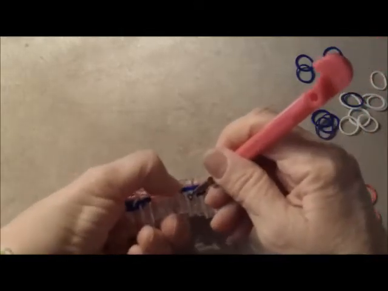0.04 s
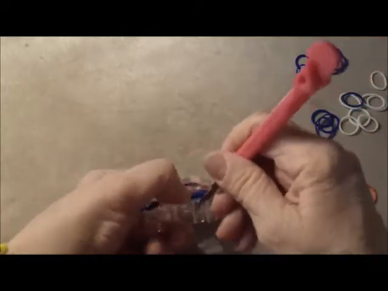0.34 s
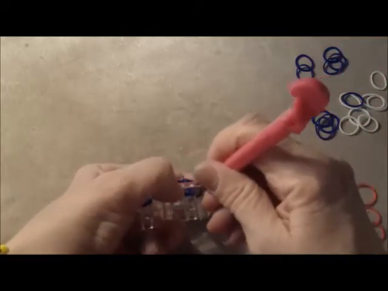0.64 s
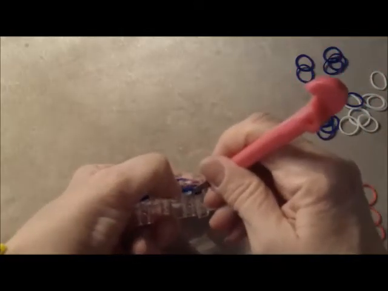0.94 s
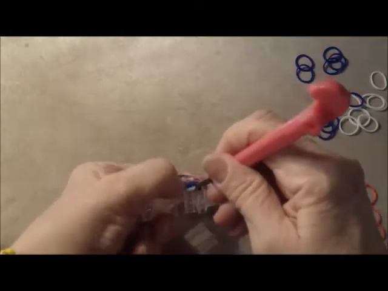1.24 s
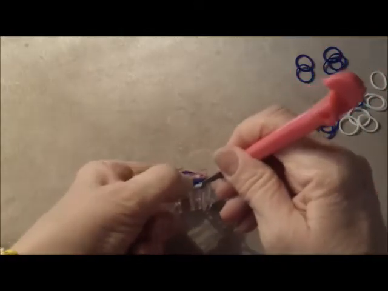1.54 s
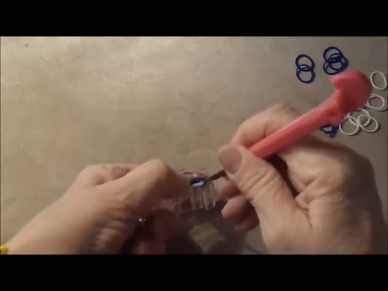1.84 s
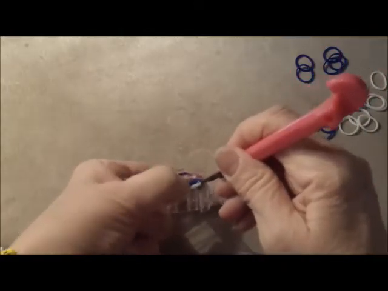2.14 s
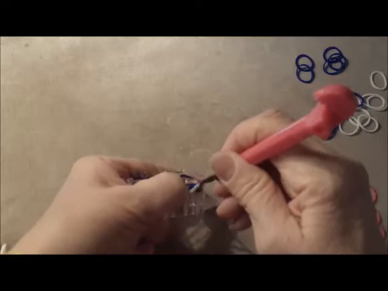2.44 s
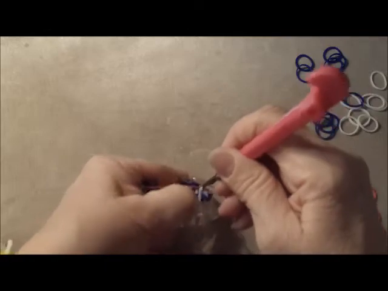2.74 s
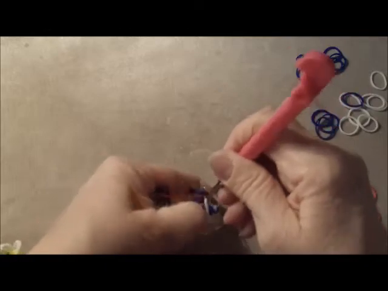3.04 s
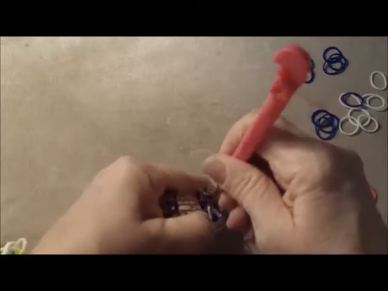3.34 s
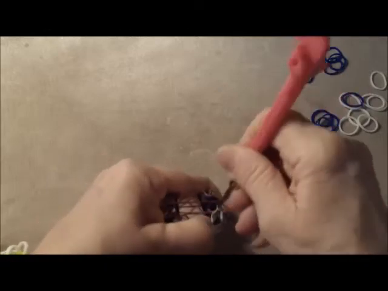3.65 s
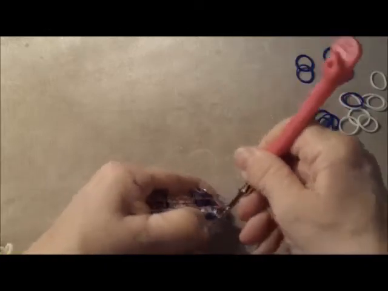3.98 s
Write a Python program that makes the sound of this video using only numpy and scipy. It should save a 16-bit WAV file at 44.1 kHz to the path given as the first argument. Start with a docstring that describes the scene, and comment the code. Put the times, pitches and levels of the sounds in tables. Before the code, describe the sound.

A few light, dry clicks of a metal hook working rubber bands over plastic pegs, above a low room hum.

```python
"""A small room hums and hisses; a mono, narrow-band microphone is close to a hand-held plastic loom.
Just above a table, a metal hook works rubber bands over the pegs: a faint rub, then a dry click as hook
and band slip off, with a soft knock of the frame. Hands rustle; at 1.3 s a hard snap rings the hook's
shaft. After a lull the clicks bunch up from 3.1 s, the loudest at 3.7 s. Each click opens the
recorder's noise suppressor, so the background jumps up and slowly sinks again."""
import sys
import numpy as np
from scipy import signal
from scipy.fft import rfft, irfft, next_fast_len
from scipy.io import wavfile
from scipy.ndimage import uniform_filter1d

SR = 44100
rng = np.random.default_rng(int(sys.argv[2]) if len(sys.argv) > 2 else 0)


def int16_out(signal):
    """Quantize to a 16-bit WAV file."""
    q = np.round(np.clip(np.atleast_2d(signal).T, -1, 1) * 32767)
    wavfile.write(sys.argv[1], SR, q.astype(np.int16))


N = 185793

# household machines humming in the room: pitch_hz, level_db (rms), waver_db
HUM_TONES = [(166.1, -66.5, 1), (221.6, -55, 1.1), (260, -68, 3), (483.8, -75, 1), (498.7, -62, .4),
             (707, -73.5, 3)]
# mains hum and a motor close to it in pitch: pitch_hz, level_db (rms, before the trim)
THROB_TONES = [(119.94, -61), (120.98, -58)]
# room rumble: frequency_hz, relative_db
RUMBLE_SPECTRUM = [(25, -24.5), (45, -11.5), (62, -15), (85, -2), (115, 1), (150, -2.5), (200, -3.5),
                   (270, -1.5), (340, -25), (500, -28)]
# room hiss: frequency_hz, relative_db
HISS_SPECTRUM = [(120, -36), (300, -6.5), (560, -7), (800, -11), (1300, -13.5), (2200, -17), (4000, -20),
                 (7400, -22), (9000, -29)]
# a band dragged along a peg: centre_s, level_db, half_length_s
RUBS = [(.02, -60.5, 0.0063), (.466, -63, 0.0057), (1.66, -61.5, 0.045), (2.381, -60, 0.01),
        (3.925, -60, 0.03), (4.104, -54, 0.0067)]
# hook and bands slipping off the pegs: start_s, level_db, low_db, mid_db, upper_db, top_db (colour at
# 1.8, 3, 4.1, 6.6 kHz), rebound_gap_s, rebound_gain (negative pulls back), tuning_ratio, ring_ratio,
# crack_db
CLICKS = [(.347, -34.7, -7, 3.5, -2.5, -7, .00056, -0.51, 0.99, 1.45, -8),
          (1.3262, -38, -2, -7, 8, -4, 0.00073, .55, 1, .52, -4),
          (1.3298, -33.5, -7, -20, -11, -8, .00077, 0.39, 0.96, 0.67, -6),
          (1.3309, -28.5, -6.5, -26, -14, 3, 0.00045, 0.33, 1.01, 0.62, -11),
          (3.0903, -39.5, -6, -11, -6.5, -6, .0011, -.3, 1.024, .72, -4),
          (3.2092, -44, -1, 0, -2, 7, .0005, .3, 1.02, .55, -6),
          (3.7164, -35, -18, -14, -8.5, -4, .0007, .3, 0.93, .7, -12),
          (3.7185, -26.2, -10, 1, -9, -2, .00062, -0.64, .972, .77, -4),
          (3.7223, -19, -6.5, -4, -6, -19, .00045, -.39, 1.0, 1.35, -8),
          (4.0066, -41.5, -13, -25, -19, -9, .00047, .5, 1.03, 1, -5),
          (4.0163, -29, -4, -9, -0.5, 3, .000635, -0.3, .98, 1.15, -17),
          (4.1322, -33.5, 5, -3, 12.5, 4.5, 0.00053, -0.42, .987, 1.5, -8)]
# where a click's colour is set, the fourth being the main resonance: frequency_hz
COLOUR_HZ = (1800, 3000, 4100, 5200, 6600)
# resonances of pegs and hook: pitch_hz, relative_db, t60_s
PEG_MODES = [(1533, -7, 0.0076), (1874, -9, 0.01), (2386, -5, 0.0076), (2925, -3.5, 0.0071),
             (3170, -5, 0.013), (3610, -4.5, 0.0088), (3980, -5.5, 0.01), (4480, -5, 0.0077),
             (5060, 0, 0.01), (5380, -0.7, 0.0058), (5670, -7.5, 0.011), (6300, -1.5, 0.0077),
             (6670, -4.5, 0.0077), (7024, -6, 0.013)]
# knocks of the frame: start_s, level_db, pitch_hz, t60_s
KNOCKS = [(.3477, -37.5, 730, 0.013), (1.682, -38.5, 103, 0.1), (3.0900, -31.5, 254, 0.022),
          (3.722, -27.5, 280, 0.045), (4.0166, -36, 760, 0.013), (4.1324, -35, 746, 0.024)]
# hands shifting on the loom: centre_s, level_db, half_length_s
HAND_MOVES = [(.43, -56, 0.057), (.6, -53, 0.083), (1.49, -58, 0.045), (1.69, -56.5, 0.016),
              (3.17, -59.5, 0.044), (3.35, -53, 0.094), (3.78, -53.5, 0.065)]
# the hardest snaps striking the shaft: start_s, strike_db, place (0-1 along it), tilt_db_per_octave
SHAFT_HITS = [(1.331, -23.5, .5, 9), (3.7226, -23, .38, -5)]
# faint after-ring of the metal shaft: pitch_hz, relative_db, t60_s
SHAFT_MODES = [(3203, -35.5, .2), (3871, -35.5, .25), (5230, -29.5, .24), (5520, -27.5, .2),
               (6135, -32, .2), (6900, -31, .17)]
# colour of the room's tail: frequency_hz, relative_db
TAIL_SPECTRUM = [(300, -0.5), (2400, -1), (3400, 0.5), (4400, -2), (5100, -5.5), (6100, 2), (7100, 4)]


def from_db(db):
    """Decibels to gain."""
    return 10 ** (np.asarray(db) / 20)


def rms_one(x):
    """Scale to unit rms."""
    return x / np.sqrt(np.mean(x ** 2) + 1e-20)


def add(track, start_s, sound):
    """Mix a short sound into a track."""
    at = int(round(start_s * SR))
    track[at:at + len(sound)] += sound[:N - at]


def shaped_noise(gain_at):
    """White noise weighted by a gain over frequency, rms 1."""
    size = next_fast_len(N, True)
    bins_hz = np.maximum(np.arange(size // 2 + 1) * SR / size, 1)
    spectrum = rfft(rng.standard_normal(size)) * gain_at(bins_hz)
    return rms_one(irfft(spectrum, size)[:N])


def noise(spectrum):
    """Steady noise coloured by rows of frequency_hz, relative_db."""
    hz, db = np.transpose(spectrum)
    return shaped_noise(lambda bins_hz: from_db(np.interp(np.log(bins_hz), np.log(hz), db)))


def drift(rate_hz):
    """Random wander, rms 1, mostly slower than rate_hz."""
    return shaped_noise(lambda bins_hz: 1 / (1 + (bins_hz / rate_hz) ** 2))


def strokes(rows):
    """Envelope of a row of smooth, bell-shaped movements."""
    t = np.arange(N) / SR
    return sum(from_db(db) * np.exp(-.5 * ((t - centre_s) / half_s) ** 2) for centre_s, db, half_s in rows)


def ring(hz, t60_s, t):
    """One struck mode dying away."""
    return np.sin(2 * np.pi * hz * t) * np.exp(-np.log(1000) * t / t60_s)


def motor_throb(swell_s=.58, trim_db=.1):
    """A motor beats against the mains hum, swelling about once a second."""
    t = np.arange(N) / SR - swell_s
    return sum(np.sqrt(2) * from_db(db + trim_db) * np.cos(2 * np.pi * hz * t) for hz, db in THROB_TONES)


def room_tone(rumble_db=-52.5, hiss_db=-53.5):
    """Behind the loom, household machines waver over steady rumble and hiss."""
    t = np.arange(N) / SR
    hum = 0
    for hz, db, waver_db in HUM_TONES:
        phase_wander = .12 * drift(2)
        tone = np.sqrt(2) * np.sin(2 * np.pi * (hz * t + rng.random()) + phase_wander)
        hum += from_db(db + waver_db * drift(6)) * tone
    return hum + from_db(rumble_db) * noise(RUMBLE_SPECTRUM) + from_db(hiss_db) * noise(HISS_SPECTRUM)


def band_rubs(grain_db=3):
    """Rubber sticks and slips on plastic in short grainy strokes."""
    friction = noise([(500, -11.5), (2000, -3), (4500, 1.5), (7000, 4), (9000, -32)])
    return strokes(RUBS) * rms_one(friction * from_db(grain_db * drift(150)))


def click(colour_db, gap_s, rebound_gain, tuning_ratio, ring_ratio, crack_db, crack_s=.0034):
    """The hook slips off a peg and rebounds twice; the pull of the bands tunes and damps the modes."""
    t = np.arange(SR // 20) / SR
    body = 0
    for k, (hz, db, t60_s) in enumerate(PEG_MODES):
        strength = (-1) ** k * from_db(db + np.interp(hz, COLOUR_HZ, colour_db))
        body += strength * ring(hz * tuning_ratio, t60_s * ring_ratio, t)
    contacts = sum(rebound_gain ** k * np.interp(t - k * gap_s, t, body) for k in range(3))
    contacts /= np.sqrt(np.sum(contacts ** 2) / (SR // 500))   # rms 1 when packed into 2 ms
    # toneless snap of the rubber
    crack = from_db(crack_db) * rng.standard_normal(len(t)) * np.exp(-t / crack_s)
    return contacts + signal.sosfilt(signal.butter(2, 1000, "high", fs=SR, output="sos"), crack)


def hook_clicks():
    """Each contact colours the modes in its own way, against the main resonance near 5.2 kHz."""
    out = np.zeros(N)
    for start_s, db, low_db, mid_db, upper_db, top_db, *contact in CLICKS:
        colour_db = (low_db, mid_db, upper_db, 0, top_db)
        add(out, start_s, from_db(db) * click(colour_db, *contact))
    return out


def frame_knocks():
    """The frame knocks as a band lets go or a finger shifts; the fingers quickly damp it."""
    out, t = np.zeros(N), np.arange(SR // 10) / SR
    for start_s, db, hz, t60_s in KNOCKS:
        add(out, start_s, -from_db(db) * ring(hz, t60_s, t))
    return out


def hand_rustle():
    """Soft skin shifting on the frame makes a low, dull rustle."""
    skin = noise([(40, -21.5), (85, -8.5), (115, 6), (170, -17), (330, -5.5), (450, -18),
                  (900, -28), (1350, -24), (2000, -38), (6000, -61)])
    return strokes(HAND_MOVES) * skin


def shaft_ring(split_hz=85, twin_gain=.6):
    """The place struck decides which shaft modes ring on; each is a close pair, so it flutters."""
    out, t = np.zeros(N), np.arange(SR // 2) / SR
    for start_s, strike_db, place, tilt_db_per_octave in SHAFT_HITS:
        for k, (hz, mode_db, t60_s) in enumerate(SHAFT_MODES, 1):
            gain = from_db(strike_db + mode_db + tilt_db_per_octave * np.log2(hz / COLOUR_HZ[3]))
            mode_shape = np.sin(k * np.pi * place)
            pair = ring(hz, t60_s, t) - twin_gain * ring(hz + split_hz, t60_s, t)
            add(out, start_s, gain * mode_shape * pair / np.hypot(1, twin_gain))
    return out


def room_reflections(x, t60_s=.27, tail_db=-16.5, echo_s=.0106, echo_db=-21):
    """The small room returns one near reflection and a short, coloured diffuse tail."""
    t = np.arange(SR // 2) / SR
    build_up = 1 - np.exp(-t / .0022)
    tail = noise(TAIL_SPECTRUM)[:len(t)] * np.exp(-np.log(1000) * t / t60_s) * build_up
    response = from_db(tail_db) * tail / np.sqrt(np.sum(tail ** 2))
    add(response, echo_s, from_db([echo_db]))
    return signal.fftconvolve(x, response)[:N]


def suppressor(x, depth_db=6.5, close_s=.79, open_from_db=-59, open_fully_db=-39.5):
    """The noise suppressor opens at once on a burst of treble, then slowly turns the level down again."""
    treble = signal.sosfilt(signal.butter(2, 1500, "high", fs=SR, output="sos"), x.mean(axis=0))
    power = np.abs(uniform_filter1d(treble ** 2, size=SR // 250))
    treble_db = 10 * np.log10(power + 1e-18)
    push = np.clip((treble_db - open_from_db) / (open_fully_db - open_from_db), 0, 1)
    push[0] = .77   # starts mostly open
    closing = np.exp(-np.arange(N) / SR / close_s)
    opening = np.maximum.accumulate(push / closing) * closing   # each peak decays until overtaken
    return x * from_db(-depth_db * (1 - opening))


def scene():
    """Handwork close to one microphone, the room behind it, alike in both channels."""
    handwork = hook_clicks() + shaft_ring() + frame_knocks() + band_rubs() + hand_rustle()
    at_microphone = handwork + room_reflections(handwork) + room_tone() + motor_throb()
    return np.tile(at_microphone, (2, 1))


def record(dry):
    """The recorder drops the bass below 70 Hz, turns down steady noise and cuts steeply at 7.4 kHz."""
    low_cut = signal.butter(3, 70, "high", fs=SR, output="sos")
    high_cut = signal.ellip(8, .3, 60, 7400, fs=SR, output="sos")
    thin = signal.sosfilt(low_cut, dry)
    return signal.sosfilt(high_cut, suppressor(thin))


dry = scene()
out = record(dry)
int16_out(out)
```